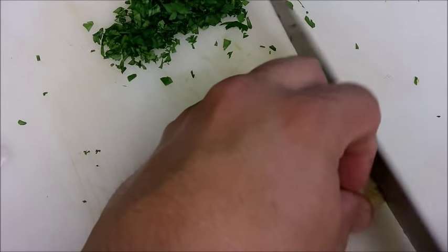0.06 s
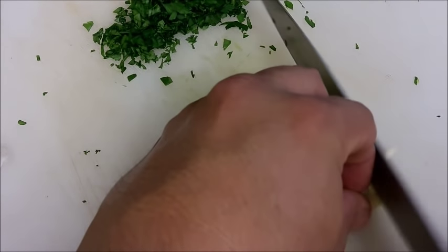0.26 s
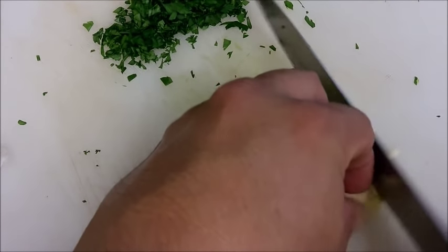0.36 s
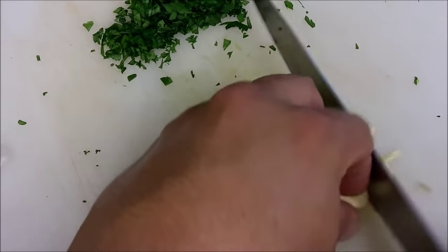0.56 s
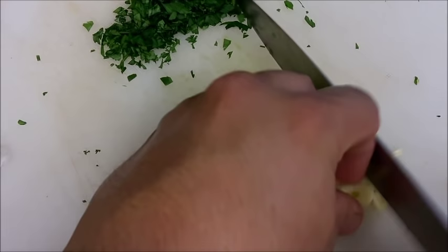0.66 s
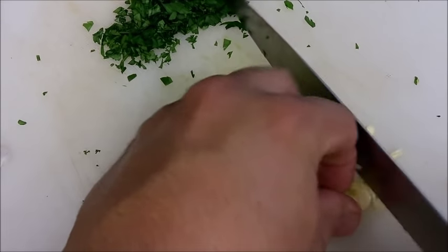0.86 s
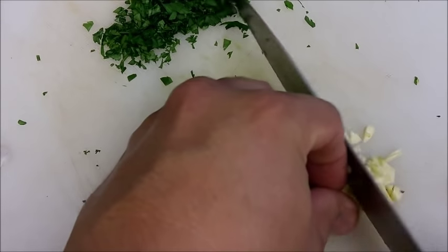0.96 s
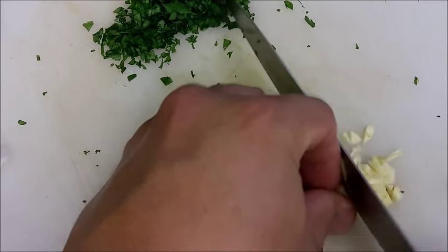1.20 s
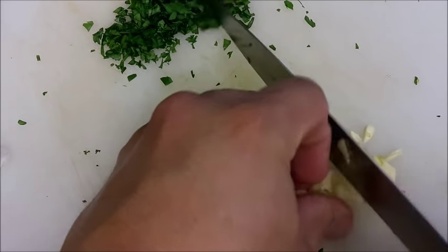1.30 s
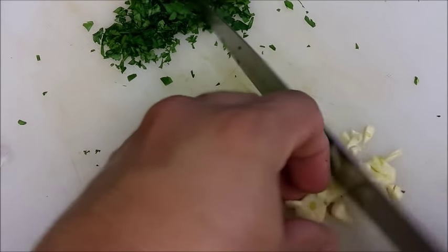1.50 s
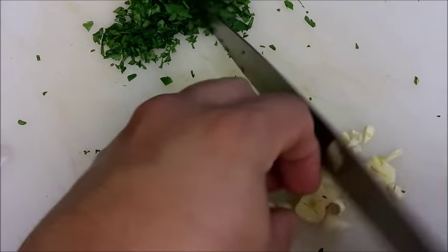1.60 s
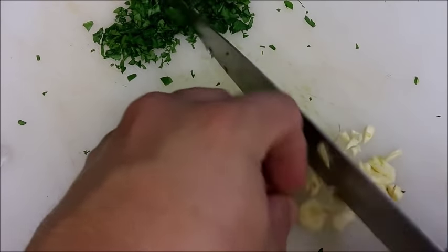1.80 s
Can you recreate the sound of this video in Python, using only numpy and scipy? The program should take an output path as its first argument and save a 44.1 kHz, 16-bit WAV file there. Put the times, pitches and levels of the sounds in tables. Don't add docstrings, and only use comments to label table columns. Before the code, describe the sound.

Knife knocks on a plastic cutting board: one already fading, then seven even strokes, each led by a brief crunch, finishing on a crunch alone; small hard kitchen, faint hum, close stereo microphone.

```python
import sys
import numpy as np
from scipy import signal
from scipy.fft import rfft, irfft, next_fast_len
from scipy.io import wavfile
from scipy.ndimage import map_coordinates

SR = 44100
rng = np.random.default_rng(int(sys.argv[2]) if len(sys.argv) > 2 else 0)


def wrap_up_sound(samples):
    columns = np.atleast_2d(samples).T
    tamed = np.clip(columns, -1, 1)
    steps = np.round(tamed * 32767).astype(np.int16)
    wavfile.write(sys.argv[1], SR, steps)


def voltage_ratio(level):
    return 10 ** (np.asarray(level, float) / 20)


N = 81585
LEAD = 4410


def unit(x):
    return x / np.sqrt(np.mean(x ** 2) + 1e-20)


def along(points, hz):
    f, v = np.transpose(points)
    return np.interp(np.log(hz + 1), np.log(f + 1), v)


def filtered(x, response):
    m = next_fast_len(x.shape[-1] + 8192)
    return irfft(rfft(x, m) * response(np.fft.rfftfreq(m, 1 / SR)), m)[..., :x.shape[-1]]


def shut(points):
    return lambda hz: voltage_ratio(along(points, hz)) * (hz > points[0][0] / 2)


def peaks(table):
    return lambda f: sum(voltage_ratio(db) * 1j * f * w / (c * c - f * f + 1j * f * w) for c, w, db in table)


def ports(x):
    return np.array([x, np.roll(x, 14)])


def add(track, s, sound):
    part = track[:, LEAD + round(s * SR):][:, :sound.shape[1]]
    part += sound[:, :part.shape[1]]


def ring(hz, t60, t, rise):
    t = np.maximum(t, 0)
    return -np.sin(2 * np.pi * hz * t) * voltage_ratio(-60 * t / t60) * (1 - np.exp(-t / rise))


def blow(modes, weight_db, scatter_db, count=SR // 10):
    t, luck = np.arange(count) / SR, rng.standard_normal((len(modes), 2))
    out = 0
    for (hz, left, right, t60, sign), (level_luck, pitch_luck) in zip(modes, luck):
        level_db = np.array([[left], [right]]) + weight_db(hz) + scatter_db * level_luck
        out = out + sign * voltage_ratio(level_db) * ring(hz * (1 + .005 * pitch_luck), t60, t, .0005)
    return out


# (frequency [Hz], level per Hz [dB])
AIR_SPECTRUM = [(18, -52), (30, 4), (106, -8), (239, -8.5), (486, -14), (1250, -11), (3400, -30.5),
                (5500, -38.5), (16000, -48.5)]
# (frequency [Hz], correlation [1])
PORT_COHERENCE = [(60, 0.46), (300, 1), (1000, 0.043), (4000, 0.035)]
# (frequency [Hz], rms level [dB])
APPLIANCE_HUM = [(118, -63.5)]


def air():
    def shape(hz):
        angle = np.arccos(np.clip(along(PORT_COHERENCE, hz), -1, 1)) / 2
        return voltage_ratio(along(AIR_SPECTRUM, hz)) * [np.cos(angle), np.sin(angle)]

    mid, side = filtered(rng.standard_normal((2, N)), shape)
    sway = map_coordinates(rng.standard_normal(40), [np.arange(N) * 12 / SR])
    hum = 0
    for hz, db in APPLIANCE_HUM:
        phase = 2 * np.pi * hz * np.arange(N) / SR + 0.76 * sway[::-1]
        hum = hum + voltage_ratio(db + 2.5 + 2 * sway) * np.sin(phase)
    return voltage_ratio(-55.5) * unit(np.array([mid + side, mid - side])) + hum


# (frequency [Hz], t60 [s])
ROOM_T60 = [(100, 0.6), (400, 0.19), (1100, 0.27), (3000, 0.34), (8000, 0.38), (15000, 0.27)]
# (frequency [Hz], level [dB])
ROOM_COLOUR = [(100, -29), (400, 12), (1100, -1), (3000, -2.5), (8000, 2), (15000, -9.5)]


def room(x):
    edges = [0] + [LEAD + round(row[0] * SR) for row in CLOVE_CUTS] + [x.shape[1]]
    share = .75
    gap_s = .003
    out = np.zeros((2, x.shape[1] + SR))
    same = rng.standard_normal((2, SR // 2))
    for a, b in zip(edges, edges[1:]):
        noise = np.sqrt(share) * same + np.sqrt(1 - share) * rng.standard_normal(same.shape)
        hz, t, z = signal.stft(noise, SR, nperseg=256)
        decay = voltage_ratio(-60 * t / along(ROOM_T60, hz)[:, None])
        tail = signal.istft(z * decay, SR, nperseg=256)[1]
        tail = filtered(tail / np.linalg.norm(tail[0]), lambda f: voltage_ratio(along(ROOM_COLOUR, f)))
        add(out, (a - LEAD) / SR + gap_s, signal.fftconvolve(x[:, a:b], tail, axes=1))
    return out[:, :x.shape[1]]


# (time [s], frequency [Hz], level [dB], t60 [s])
BLADE_SINGING = [(-.02, 5080, -73, .45), (.22, 5150, -69, .12)]


def sing():
    out, t = np.zeros((2, N + LEAD)), np.arange(SR // 3) / SR
    for s, hz, db, t60 in BLADE_SINGING:
        tone = unit(filtered(rng.standard_normal((2, len(t))), peaks([(hz, 130, 0)])))
        add(out, s, voltage_ratio(db - 60 * t / t60) * tone)
    return out


# (centre [Hz], width [Hz], level [dB])
FREE_BLADE = [(2130, 208, 6), (2940, 420, 3), (3760, 150, -5)]
# (time [s], length [s], level [dB])
BLADE_SCRAPES = [(1.797, 0.011, -49.5)]


def scrape():
    out, t = np.zeros((2, N + LEAD)), np.arange(SR // 8) / SR
    for s, length, db in BLADE_SCRAPES:
        shake = np.clip(t / 0.0024, 0, 1) * np.exp(-np.maximum(t - length, 0) / .012)
        noise = rng.standard_normal((3, len(t)))
        rub = ports(noise[2]) + .5 * noise[:2]
        hum = filtered(filtered(rub, peaks(FREE_BLADE)), peaks(FREE_BLADE))
        add(out, s, voltage_ratio(db) * shake * unit(hum))
    return out


# (frequency [Hz], level per Hz [dB])
JUICE_SPECTRUM = [(1470, 0), (2500, -9.5), (2720, -26), (3040, -2), (4210, -4.5), (8800, -6.5),
                  (10400, -10), (16000, -8.5)]
# (centre [Hz], width [Hz], level [dB])
BLADE_MODES = [(7300, 410, 3), (9180, 300, 9)]


def juicy(fizz_db):
    def response(f):
        tilt = voltage_ratio(fizz_db * np.log2(np.maximum(f / 8000, 1)))
        return shut(JUICE_SPECTRUM)(f) * (1 + voltage_ratio(-3) * peaks(BLADE_MODES)(f)) * tilt
    return response


# (frequency [Hz], level [dB])
SOFT_MODES = [(600, 2), (670, -0.5), (730, 2.5), (830, -2.5), (930, 3.5), (1070, 2.5), (1160, 7),
              (1250, 1.5), (1430, 5), (1590, 5.5), (1930, 5), (2130, 0.5), (2500, -8), (2800, -3)]


def soft(centre_hz):
    damped = [(hz, db + (-1) ** k, db - (-1) ** k, .022, 1) for k, (hz, db) in enumerate(SOFT_MODES)]

    def weight_db(hz):
        near = -6 * (np.log2(hz / centre_hz) / .22) ** 2
        return max(near, -14 - 7 * abs(np.log2(hz / 1200)))

    sound = filtered(blow(damped, weight_db, 2), lambda f: (1j * f / (520 + 1j * f)) ** 2)
    return sound / np.abs(sound.mean(0)).max()


# (start [s], length [s], hiss level [dB], push level [dB], push centre [Hz])
CLOVE_CUTS = [
    (0.165, 0.028, -57, -43.5, 970),
    (0.401, 0.022, -59, -43, 710),
    (0.617, 0.035, -62, -53, 990),
    (0.842, 0.042, -63.5, -49, 1020),
    (1.049, 0.032, -59.5, -51, 940),
    (1.274, 0.038, -60.5, -54.5, 760),
    (1.503, 0.031, -63, -51.5, 820),
    (1.773, 0.044, -65, -53.5, 1020),
]
CUT_FIZZ = [-4, 0.5, -1, -14, -5, -6, 1, 4]
# (time [s], board peak level [dB], centre [Hz], tick level [dB])
FIBRE_SNAPS = [(0.1753, -37.5, 736, -49.5), (0.1823, -40, 950, -57), (0.1945, -45, 1100, -55),
               (0.381, -47, 900, -67), (0.6285, -42.5, 940, -59), (0.855, -42, 1090, -60),
               (1.0875, -40, 1260, -51), (1.0975, -45, 1090, -54), (1.2845, -66, 700, -53),
               (0.4088, -28, 705, -50.5), (.638, -29.5, 930, -47), (0.835, -65, 890, -62),
               (0.8581, -34, 1060, -54), (1.0617, -41, 700, -64), (1.0676, -41, 700, -55),
               (1.084, -35.5, 1070, -46.5), (1.1007, -68, 905, -52), (1.103, -39, 615, -53),
               (1.168, -58, 905, -65), (1.2904, -44, 820, -44.5), (1.301, -35, 625, -53),
               (1.5093, -40.5, 714, -59.5), (1.66, -64, 940, -76), (1.5247, -31, 926, -49),
               (1.5355, -61, 720, -58), (1.782, -49, 750, -65), (1.7925, -45.5, 700, -56),
               (1.7985, -34.5, 900, -52), (1.809, -36, 710, -48.5), (1.813, -43, 1090, -46),
               (1.8175, -52, 940, -45.5), (1.823, -68, 990, -46)]


def press_through():
    out, t = np.zeros((2, N + LEAD)), np.arange(SR // 8) / SR
    for (s, length, hiss_db, push_db, centre_hz), fizz_db in zip(CLOVE_CUTS, CUT_FIZZ):
        burst = rng.random(len(t)) < 2500 / SR
        size, noise = rng.exponential(1, len(t)), rng.standard_normal((4, len(t)))
        grains = unit(burst * voltage_ratio(3.1 * size) * np.sign(noise[3]))
        press = np.clip(t / (0.37 * length), 0, 1) ** 2 * np.exp(-np.maximum(t - length, 0) / .012)
        hiss = unit(filtered(ports(grains) + 0.95 * noise[:2], juicy(fizz_db)))
        force = (grains + noise[2])[None]
        push = unit(signal.fftconvolve(force, soft(centre_hz), axes=1)[:, :len(t)])
        add(out, s, press * (voltage_ratio(hiss_db) * hiss + voltage_ratio(push_db) * push))
    return out


def snap_fibres():
    out, k = np.zeros((2, N + LEAD)), np.arange(600)
    for s, db, centre_hz, tick_db in FIBRE_SNAPS:
        add(out, s, voltage_ratio(db) * soft(centre_hz))
        fizz_db = CUT_FIZZ[np.argmin([abs(s - row[0]) for row in CLOVE_CUTS])]
        noise = ports(rng.standard_normal(600)) + 3.9 * rng.standard_normal((2, 600))
        tick = unit(filtered(noise, juicy(fizz_db)))
        add(out, s, voltage_ratio(tick_db - 60 * k / SR / 0.029) * np.minimum(k / 30, 1) * tick)
    return out


# (frequency [Hz], level [dB], t60 [s], left minus right [dB], polarity [1])
COUNTER_MODES = [(73, -21, 0.087, 4.5, -0.6), (92.5, -45, 0.48, 1, 0.64), (99.5, -20.5, 0.063, 3, 0.7),
                 (157.6, -37.5, 0.098, -8, -0.73), (181.5, -33.5, 0.13, 3.5, -1.07),
                 (235.3, -28.5, 0.11, 9, -0.36)]
# (frequency [Hz], level [dB], t60 [s])
CUPBOARD_AIR = [(187, -54, 0.3), (290.35, -46, 0.62), (384, -50, .12)]


def boom():
    out, t = np.zeros((2, N + LEAD)), np.arange(SR // 2) / SR
    late, door_late = t - .0084, t - .0012
    cabinet = -voltage_ratio(-34.5) * ring(293.6, 0.18, door_late, .0005)
    for hz, db, t60, pan, sign in COUNTER_MODES:
        cabinet = cabinet + sign * voltage_ratio(db + np.array([[pan], [-pan]]) / 2) * ring(hz, t60, late, .0005)
    for hz, db, t60 in CUPBOARD_AIR:
        cabinet = cabinet - voltage_ratio(db) * ring(hz, t60, door_late, 0.0031)
    for s, _, thud_db, _, _ in BLADE_BLOWS:
        add(out, s, voltage_ratio(thud_db) * cabinet)
    return out


# (time [s], strength [dB], counter thud [dB], bending [dB], crack brightness [dB])
BLADE_BLOWS = [
    (-.0295, -3, 0.5, -10, 10),
    (0.2044, -1.06, 0, -0.6, 14),
    (0.4332, -0.8, 1, -28, 14.5),
    (0.663, -0.5, -0.3, -30, 10.5),
    (0.8805, -0.26, 2, -36, 14),
    (1.11078, -3, -0.6, -10.5, 2),
    (1.3226, -3, 1.6, -10, 7),
    (1.544, 0.05, 3, -19, 9.5),
]
# (frequency [Hz], left [dB], right [dB], t60 [s], polarity [1])
LOCAL_MODES = [(728, -21, -45, .009, -1), (896, -17, -33, .021, 1), (1042, -14, -9.5, .009, 1),
               (1151, -40, -21, .02, -1), (1228, -7, -8, .014, 1), (1301, -6, -14, .009, -1),
               (1531, -24, -26, .022, 1), (2146, -18, -16, .006, -1), (2511, -19, -28, .006, -1),
               (3300, -32, -32, .003, 1), (4200, -37, -37, .003, 1)]
# (frequency [Hz], left [dB], right [dB], t60 [s], polarity [1])
BOARD_MODES = [(566, -34, -41.5, 0.063, -0.93), (613, -38, -30, 0.12, -0.014),
               (834, -38.5, -65, 0.013, -0.54), (877, -30.5, -29.5, 0.026, -2.44),
               (1073, -26, -22, 0.02, 0.86), (1251, -18.5, -18.5, 0.049, 0.57),
               (1465, -43, -19, 0.045, 0.72), (1744, -37, -74, 0.22, -0.16), (2060, -59, -47, 0.073, 0.92),
               (3260, -43, -54, 0.048, 0.21)]
# (frequency [Hz], left [dB], right [dB], t60 [s], polarity [1])
BENDING_MODES = [(673, -19, -19, .03, -1), (830, -19, -28, .043, 1)]
# (frequency [Hz], left [dB], right [dB], t60 [s], polarity [1])
LASTING_MODES = [(956, -40.5, -45.5, 0.1, 0.99), (1045, -37, -36.5, 0.15, -1.07),
                 (1097, -42, -44, 0.14, 0.98), (1245, -37, -34.5, 0.06, -1.12),
                 (1479, -67.5, -44, 0.3, 0.028), (1620, -53.5, -64.5, 0.39, -0.23),
                 (1615, -39, -52, 0.16, 1), (1936, -41.5, -57, 0.17, -0.94), (2054, -59, -69, 0.11, 1),
                 (2653, -71, -53, 0.2, -0.44)]
# (frequency [Hz], level [dB])
CRACK_SPECTRUM = [(500, -48), (2000, 5.5), (4000, -17.5), (6000, -31.5), (10000, -40.5), (16000, -43)]


def knock():
    out, t = np.zeros((2, N + LEAD)), np.arange(4000) / SR
    for s, db, _, bend_db, bright_db in BLADE_BLOWS:
        sound = blow(LOCAL_MODES, lambda hz: 0, .8) + blow(BOARD_MODES, lambda hz: 0, 1.6)
        sound = sound + blow(BENDING_MODES, lambda hz: bend_db, .8)
        add(out, s, voltage_ratio(db) * sound)
        add(out, s, voltage_ratio(db) * blow(LASTING_MODES, lambda hz: 0, 1.6, count=SR // 4))
        add(out, s + 0.009, voltage_ratio(db - 26) * sound)
        crack = unit(filtered(rng.standard_normal((2, 4000)), shut(CRACK_SPECTRUM)))
        add(out, s, voltage_ratio(db - 45 + bright_db - 60 * t / 0.073) * crack)
    return out


def scene():
    board, counter = knock(), boom()
    cut = press_through() + snap_fibres() + scrape() + sing()
    wet = room(voltage_ratio(-9) * (board + voltage_ratio(-3) * counter) + voltage_ratio(-6.5) * cut)
    return (board + counter + cut + wet)[:, LEAD:] + air()


def top_cut(x):
    return signal.sosfilt(signal.butter(12, 16420, fs=SR, output="sos"), x)


def record(dry):
    peak_limit, knee = .42, 3
    rounded = dry / (1 + np.abs(dry / peak_limit) ** knee) ** (1 / knee)
    heard = filtered(rounded, lambda hz: (hz < 16000) * hz ** 4 / (hz ** 4 + 56.3 ** 4))
    return top_cut(heard)


dry = scene()
out = record(dry)
wrap_up_sound(out)
```